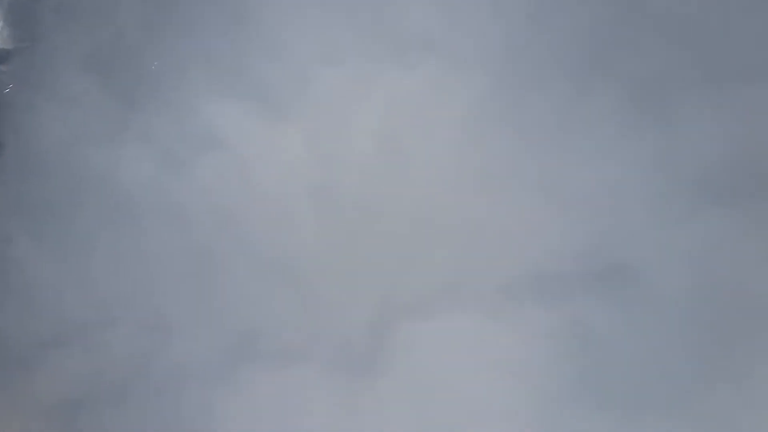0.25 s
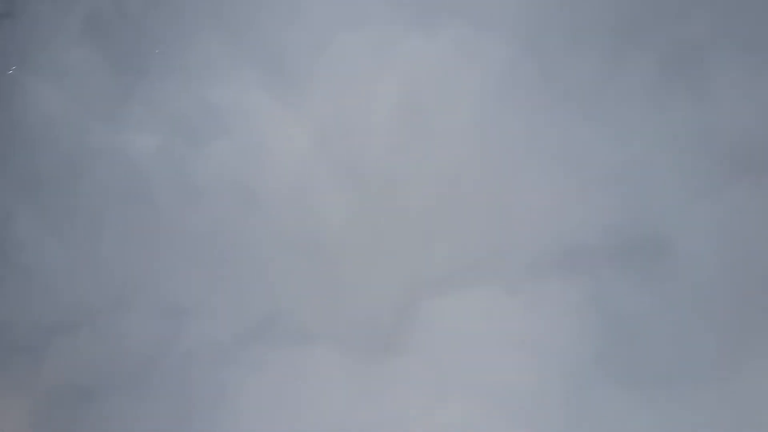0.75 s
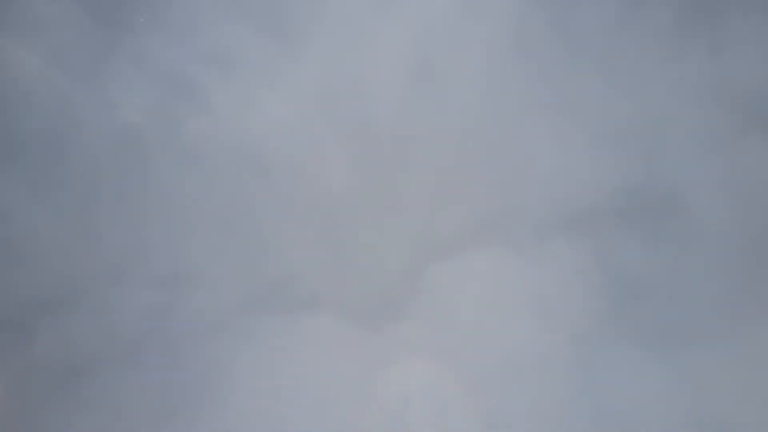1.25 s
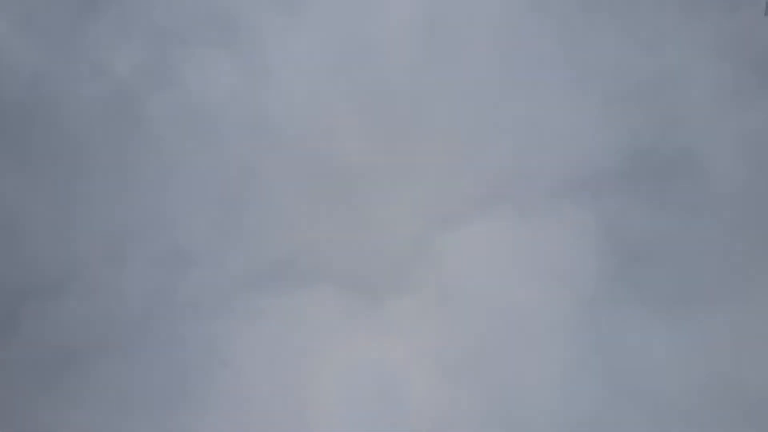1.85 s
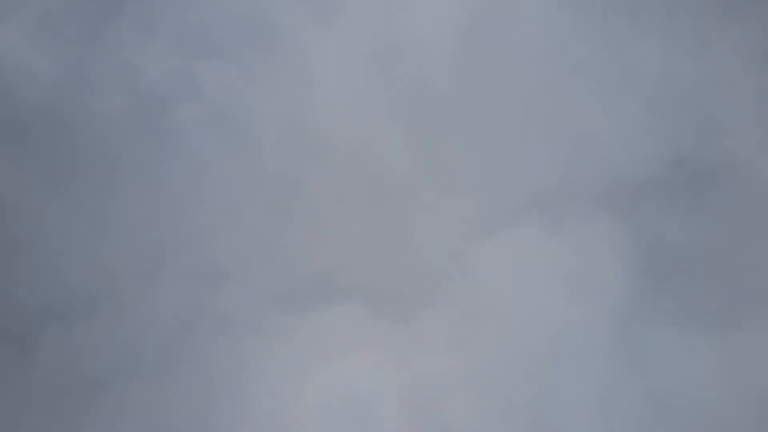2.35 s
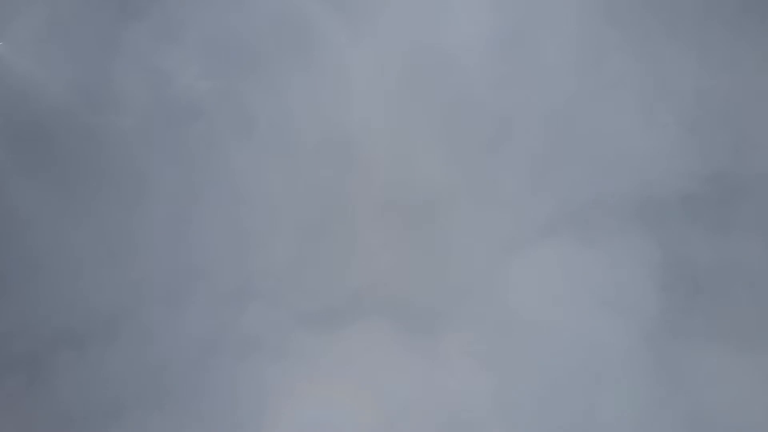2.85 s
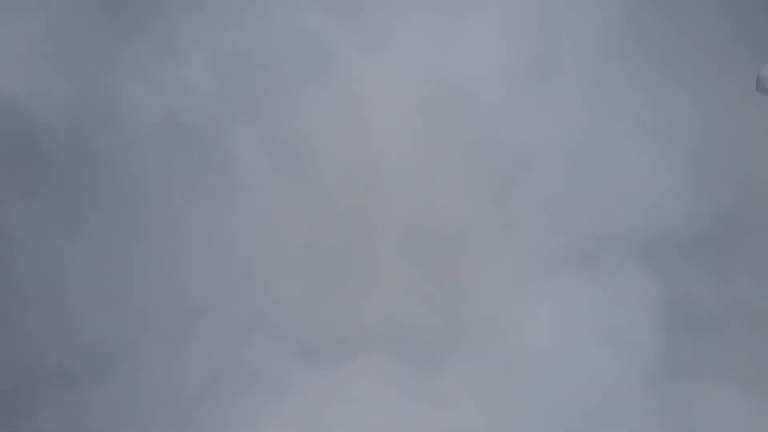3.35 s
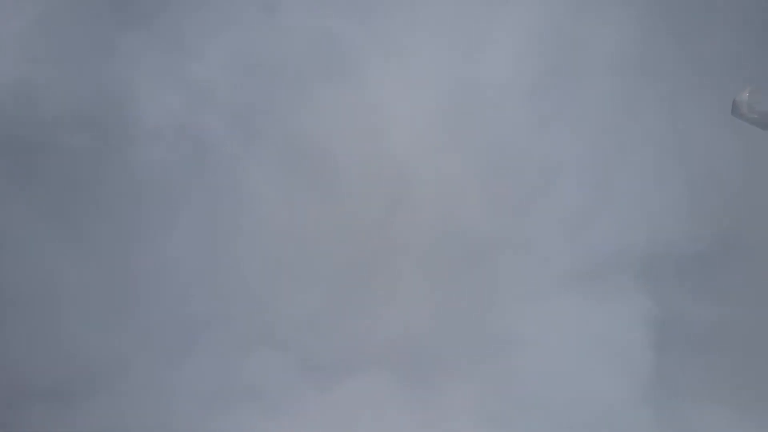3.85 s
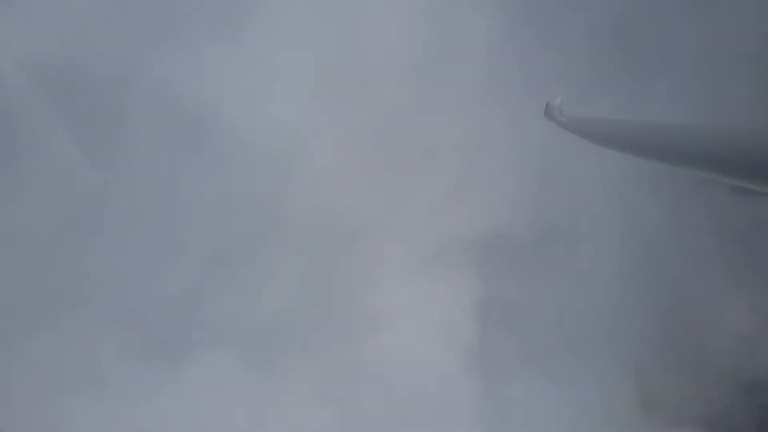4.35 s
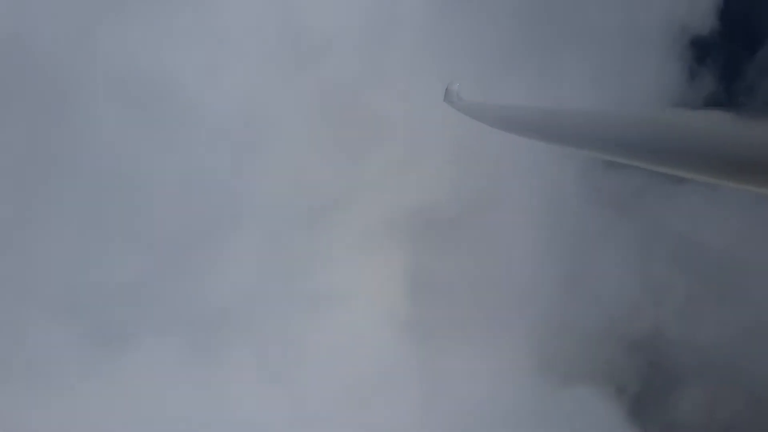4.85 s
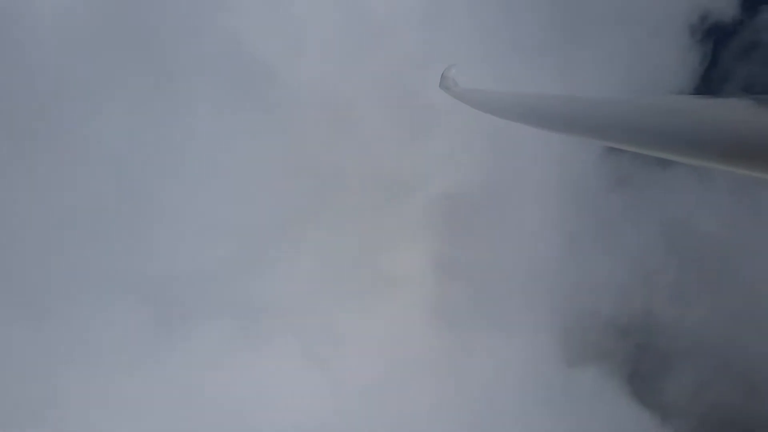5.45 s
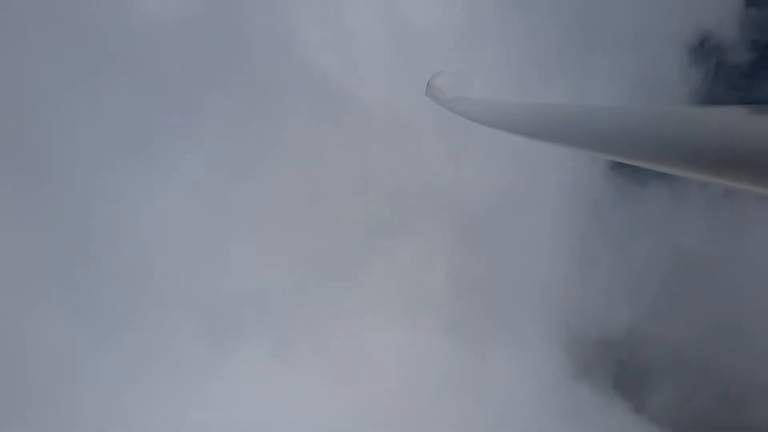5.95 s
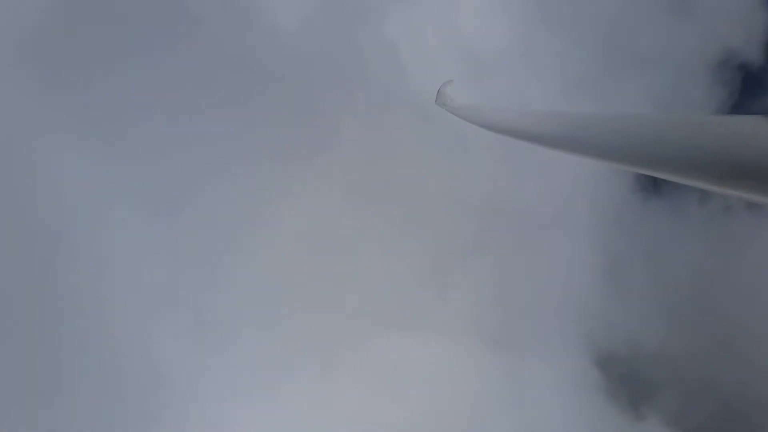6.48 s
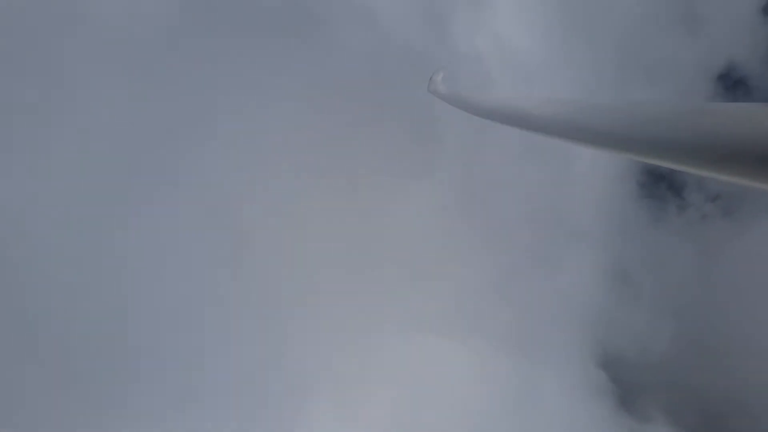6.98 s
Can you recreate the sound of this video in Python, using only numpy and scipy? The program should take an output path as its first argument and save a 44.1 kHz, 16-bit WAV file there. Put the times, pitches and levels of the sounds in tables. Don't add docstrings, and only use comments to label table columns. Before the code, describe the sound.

Low roaring airflow and cabin hum in a sailplane, interrupted by a hard handling thump, a short drop in level, softer knock and tiny ticks.

```python
import sys
import numpy as np
from scipy import signal
from scipy.fft import irfft, next_fast_len
from scipy.io import wavfile
from scipy.ndimage import uniform_filter1d, minimum_filter1d

SR = 44100
rng = np.random.default_rng(int(sys.argv[2]) if len(sys.argv) > 2 else 0)


def linear_from_db(decibels):
    return 10 ** (np.asarray(decibels, float) / 20)


def transcribe(u):
    v = np.clip(np.atleast_2d(u).T, -1, 1)
    q = np.round(v * 32767).astype(np.int16)
    wavfile.write(sys.argv[1], SR, q)


N = 318402


def evened(x):
    return x / np.sqrt(np.mean(x ** 2) + 1e-20)


def smoothed(x, size):
    return uniform_filter1d(uniform_filter1d(x, size=size), size=size)


def add(mix, start_s, sound):
    part = mix[:, round(start_s * SR):][:, :sound.shape[1]]
    part += sound[:, :part.shape[1]]


def gain_db():
    sink_at_s, sink_s, sink_db = 1.967, 0.39, -9
    hold_to_s, creep_s = 2.8, 0.73
    speed_db_per_s = 0.03
    t = np.arange(N) / SR
    down = np.clip((t - sink_at_s) / sink_s, 0, 1)
    back = np.clip((t - hold_to_s) / creep_s, 0, 1)
    dip_db = sink_db * np.sin(np.pi / 2 * down) * (1 - back) ** 1.3
    return dip_db + speed_db_per_s * (t - t.mean())


def port_hiss(colour, patchy_db=.8, flicker_db=.4):
    frames, hz = N // 256 + 5, np.fft.rfftfreq(1024, 1 / SR)
    a, b, patches = rng.standard_normal((frames, 513, 3)).T
    patches = uniform_filter1d(patches, size=14, axis=0)
    patches = evened(uniform_filter1d(patches, size=12, axis=1))
    flicker = evened(uniform_filter1d(rng.standard_normal(frames), size=5))
    colour_hz, colour_db = np.transpose(colour)
    field_db = np.interp(np.log(hz + 1), np.log(colour_hz), colour_db)[:, None] + patchy_db * patches
    low_db = np.interp(np.arange(frames) * 256, np.arange(N), gain_db())
    thin = np.clip(hz / 6000 - .6, 0, 1) * np.clip(2.6 - hz / 7000, 0, 1)
    field_db += 0.3 * low_db * thin[:, None]
    field_db += flicker_db * flicker * np.clip(hz / 9000, 0, 1)[:, None]
    return signal.istft((a + 1j * b) * linear_from_db(field_db + 15.5), nperseg=1024, noverlap=768)[1][:N]


# frequency [Hz], level [dB per Hz].
LEFT_HISS = [(20, -74), (72, -51), (200, -50.5), (520, -57), (850, -65.5), (1400, -56.5), (1900, -61),
             (2300, -65.5), (3300, -68.5), (5600, -80), (7400, -82.5), (8900, -74), (12500, -78),
             (15800, -82)]
RIGHT_HISS = [(20, -74), (72, -54), (200, -53.5), (520, -50.5), (720, -60.5), (1300, -74.5), (2200, -71.5),
              (3300, -76), (4200, -79), (5000, -79), (6800, -90.5), (9000, -117.5), (12000, -89),
              (15800, -75.5)]


def ports():
    return np.array([port_hiss(LEFT_HISS), port_hiss(RIGHT_HISS)])


def modes(table, steep):
    size = next_fast_len(N)
    hz = np.fft.rfftfreq(size, 1 / SR)[:size // 8]
    out = np.zeros((2, size // 2 + 1), complex)
    for centre_hz, width_hz, db, pan_db, lead in table:
        a, b = rng.standard_normal((2, len(hz)))
        resonance = 1 / (1 + (2 * (hz - centre_hz) / width_hz) ** 2) ** (steep / 2)
        ring = linear_from_db(db) * (a + 1j * b) * resonance
        out[0, :len(hz)] += ring * linear_from_db(pan_db / 2)
        out[1, :len(hz)] += ring * linear_from_db(-pan_db / 2) * np.exp(1j * np.pi * lead)
    return irfft(out, size)[:, :N] * np.sqrt(size * SR / 4)


# centre [Hz], width [Hz], level [dB], left over right [dB],
# right lead [half turns].
SHELL_MODES = [(186.2, 17, -45.5, 2.5, -0.072), (218.6, 30, -46, -4, -0.35), (256.3, 57, -44.5, 2, -0.15),
               (381, 64, -52, 6.5, -0.3), (437, 44, -49, 2, -0.25), (505.2, 27.4, -52, -12, -0.59),
               (555.7, 62, -54.5, 4, 0.19), (616, 47, -52.5, 5, 0.83), (671, 68, -54, 10, 0.88),
               (798.5, 90, -62.5, 16, 0.72), (890, 71, -65, 12.5, 1.32), (1045, 165, -64.5, 12, 0.76),
               (1510, 340, -66, 7, 0.39), (2165, 100, -78, -3, 0.25), (2780, 310, -76.5, 9.5, -0.054),
               (1219, 150, -67, 11.5, -0.74), (3240, 400, -77, 7, -0.77)]


def shell():
    return modes(SHELL_MODES, steep=1.84)


def steadied(x, share=0.73):
    power = smoothed((x ** 2).mean(0), 2200)
    return x * (power / power.mean() + 0.07) ** (-share / 2)


def gusts(table, half_s, sway_db):
    t = np.arange(0, N + 64, 64) / SR
    field_db = sway_db * evened(smoothed(rng.standard_normal(len(t)), 40))
    for centre_s, db in table:
        field_db += db * np.exp(-((t - centre_s) / half_s) ** 2)
    return np.interp(np.arange(N) / SR, t, field_db)


def driven(table, weather, half_s, sway_db):
    return steadied(modes(table, steep=2.2)) * linear_from_db(gusts(weather, half_s, sway_db))


# centre [s], gust or lull [dB].
HUM_MODES = [(309.7, 23.4, -37.5, 1.5, -0.15), (339.4, 33.7, -45, .8, -0.21)]
HUM_WEATHER = [(.36, 4.5), (.6, 1), (.7, -3), (1.01, 6.5), (1.77, -16), (1.92, 5), (4.2, -4), (4.99, 9),
               (5.36, -5), (5.46, 8), (5.63, 7.5), (5.85, 5), (6.17, 5.5), (6.88, -6), (6.96, 10),
               (7.16, 4)]


def hum():
    return driven(HUM_MODES, HUM_WEATHER, half_s=0.038, sway_db=2)


# centre [Hz], width [Hz], level [dB], left over right [dB], lead [half turns];
# gust centre [s], gust or lull [dB].
BOOM_MODES = [(98.8, 10.6, -33, -1, -0.0015), (112.4, 26.6, -34.5, -0.8, -0.0052),
              (143.2, 34.6, -41, 1.5, -0.012), (154.4, 18.2, -42, 5.5, 0.016)]
BOOM_WEATHER = [(.14, -1.5), (.36, 0), (.42, -2.5), (.55, 5.5), (.7, 4.5), (.94, -9), (1.1, -3), (1.85, 2),
                (3.13, 4.5), (3.36, 3.5), (3.92, 2), (4.14, 5), (4.26, 4.5), (5.02, -6.5), (5.39, 3),
                (5.55, 1), (5.63, -4), (5.77, -6), (5.85, 6), (6.25, 4.5), (6.8, 4), (6.95, -2.5),
                (7.08, 5)]


def boom():
    return driven(BOOM_MODES, BOOM_WEATHER, half_s=0.031, sway_db=1.5)


# centre [Hz], width [Hz], level [dB], left over right [dB], lead [half turns];
# gust centre [s], gust or lull [dB].
BUFFET_MODES = [(30, 86, -46.5, 5, .01), (43.7, 20.6, -40, 3, .02), (55, 27, -57, 1, .03)]
BUFFET_WEATHER = [(.35, 3), (.87, 7), (1.26, 5), (1.55, -4), (1.79, 5), (3.92, 4), (4.28, 3), (4.55, 4),
                  (5.61, 9), (5.77, 5), (6.77, 5), (7.0, -4), (7.16, 3)]


def buffet():
    return driven(BUFFET_MODES, BUFFET_WEATHER, half_s=0.035, sway_db=2.5)


def tick(db, hz, pan_db):
    t = np.arange(900) / SR
    snap = rng.standard_normal(len(t)) * linear_from_db(-60 * t / .016)
    snap = signal.lfilter(*signal.butter(3, [.78 * hz, 1.2 * hz], "band", fs=SR), snap)
    return linear_from_db(db) * snap * linear_from_db(np.array([[pan_db / 2], [-pan_db / 2]]))


# start [s], level [dB], centre [Hz], left over right [dB].
SEAM_TICKS = [
    (3.1495, -28.5, 14400, -10),
    (3.2002, -37, 15000, -6),
    (6.62, -35, 14500, -4),
]


def ticks(mix):
    for start_s, *snap in SEAM_TICKS:
        add(mix, start_s, tick(*snap))


def knock(right_db, left_db, first_hz, settled_hz, length_s):
    t = np.arange(8000) / SR
    turns = np.cumsum(settled_hz + (first_hz - settled_hz) * np.exp(-t / .0017)) / SR
    onset = np.sin(np.pi / 2 * np.minimum(t / (.14 * length_s), 1)) ** 2
    shape = (np.exp(-(t / length_s) ** 3) + .22 * linear_from_db(-60 * t / .15)) * onset
    near = -linear_from_db(right_db) * shape * np.sin(2 * np.pi * turns)
    crack = sum(np.sin(2 * np.pi * hz * t) * linear_from_db(-hz / 650) for hz in (1150, 1900, 2550, 3150, 3800, 4500))
    crack *= linear_from_db(right_db - 18 - 60 * t / .009) * np.minimum(t / .0008, 1)
    canopy = np.sin(2 * np.pi * 320 * t) * linear_from_db(2 - 60 * t / .03)
    far = np.roll(crack - canopy, 24)
    return np.array([linear_from_db(left_db) * far, near])


# start [s], right level [dB], left level [dB], first pitch [Hz],
# settled pitch [Hz], push length [s].
HOUSING_KNOCKS = [
    (1.9783, 14, 3, 565, 95, .0036),
    (2.0015, -9, -12, 300, 185, .022),
    (2.5955, -6, -9.5, 490, 160, .0062),
]


def knocks(mix):
    for start_s, *blow in HOUSING_KNOCKS:
        add(mix, start_s, knock(*blow))


def cup_db():
    cup_s, depth_db = .011, -6
    from_knock_s = np.arange(N) / SR - HOUSING_KNOCKS[0][0]
    return depth_db * np.exp(-((from_knock_s + cup_s / 2) / cup_s) ** 2)


def scene():
    mix = ports() + shell() + hum() + boom() + buffet()
    mix *= linear_from_db(gain_db() + cup_db())
    ticks(mix)
    knocks(mix)
    return mix


# frequency [Hz], threshold [dB].
FAINTEST = [(3500, -90), (5300, -81), (5900, -77.5), (7300, -83), (9500, -82), (13000, -82), (16000, -90)]


def thinned(x):
    hz, _, z = signal.stft(x, SR, nperseg=2048, noverlap=1024)
    limit = linear_from_db(np.interp(hz, *np.transpose(FAINTEST), left=-200))
    return signal.istft(z * (abs(z) > limit[:, None]), SR, nperseg=2048, noverlap=1024)[1][:, :N]


def low_pass(x):
    return signal.sosfilt(signal.butter(12, 15760, fs=SR, output="sos"), x)


def record(dry):
    dry = signal.lfilter(*signal.butter(2, 24, "high", fs=SR), dry)
    peak_db = 20 * np.log10(abs(dry).max(0) + 1e-9)
    ahead_db = -minimum_filter1d(-peak_db, size=260)
    fall_db = np.arange(N) * 420 / SR
    held_db = np.maximum.accumulate(ahead_db + fall_db) - fall_db
    over_db = np.maximum(held_db + 2.5, 0)
    ducked = dry / linear_from_db(.5 * uniform_filter1d(over_db, size=120))
    flat = ducked / (1 + abs(ducked / .93) ** 8) ** (1 / 8)
    return low_pass(thinned(flat))


dry = scene()
out = record(dry)
transcribe(out)
```